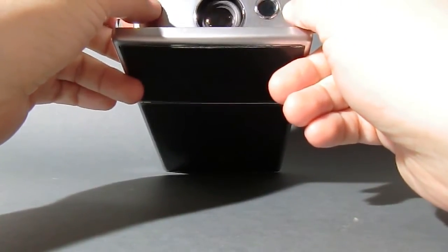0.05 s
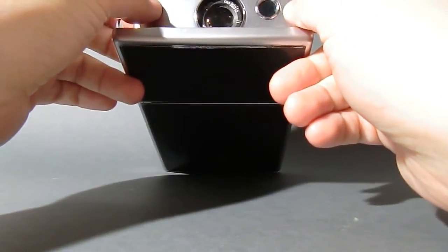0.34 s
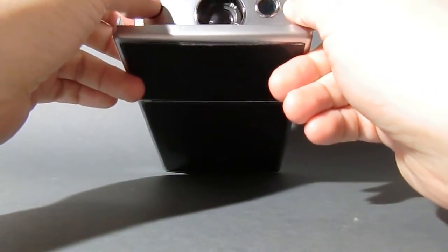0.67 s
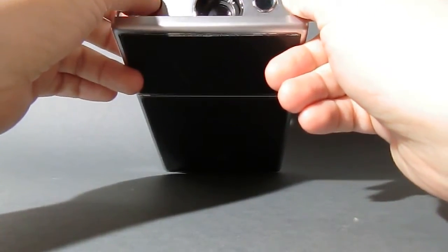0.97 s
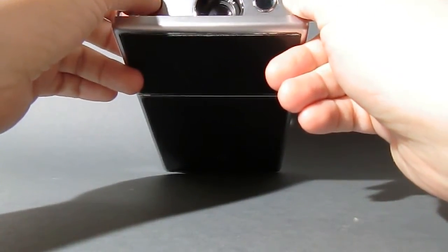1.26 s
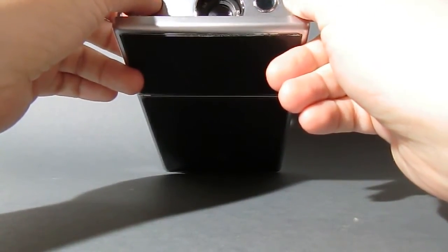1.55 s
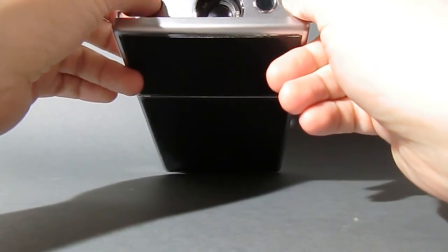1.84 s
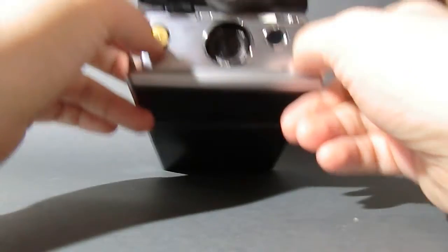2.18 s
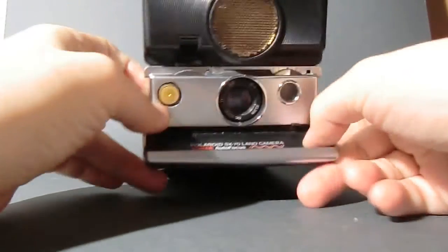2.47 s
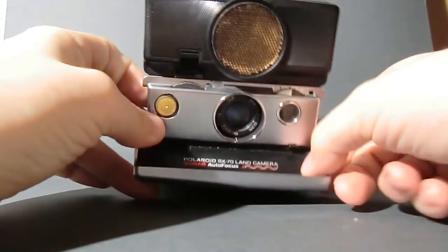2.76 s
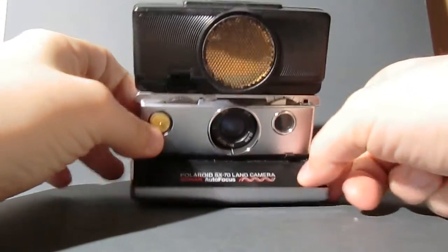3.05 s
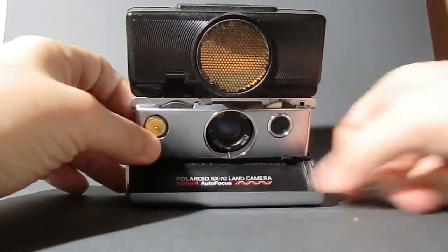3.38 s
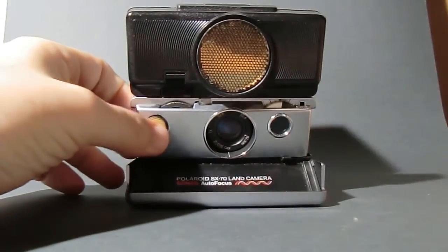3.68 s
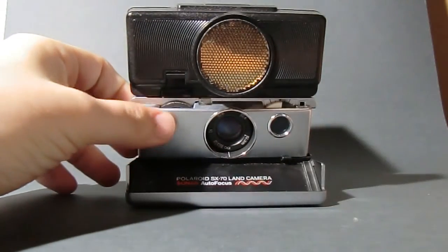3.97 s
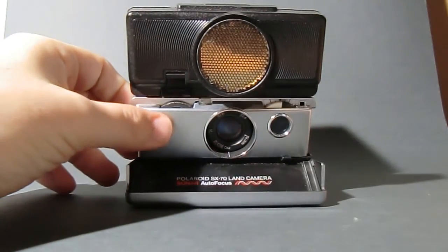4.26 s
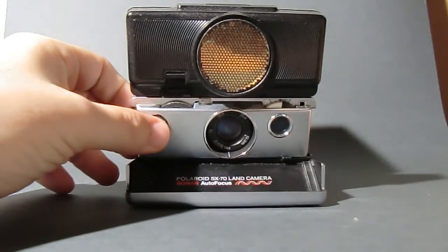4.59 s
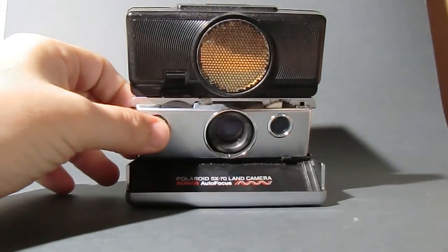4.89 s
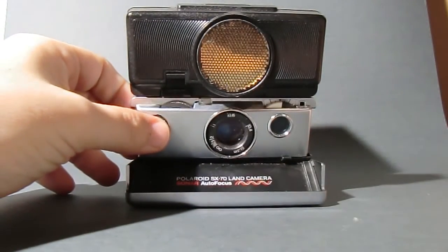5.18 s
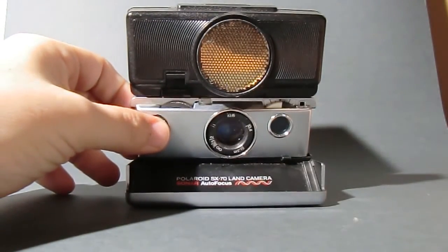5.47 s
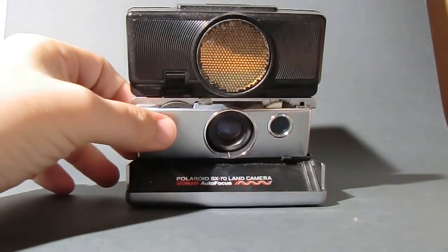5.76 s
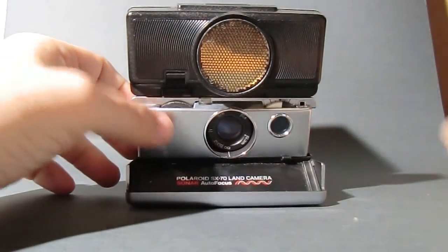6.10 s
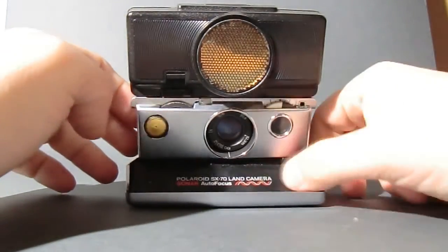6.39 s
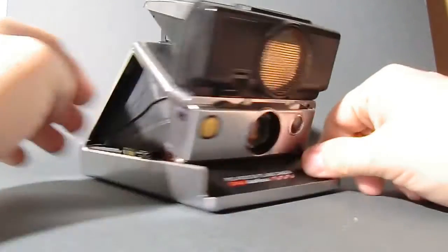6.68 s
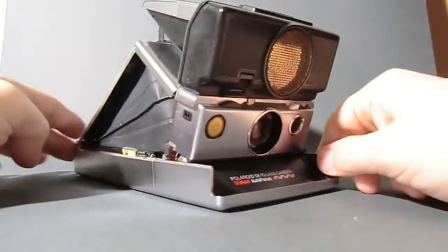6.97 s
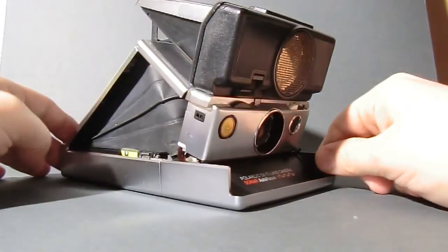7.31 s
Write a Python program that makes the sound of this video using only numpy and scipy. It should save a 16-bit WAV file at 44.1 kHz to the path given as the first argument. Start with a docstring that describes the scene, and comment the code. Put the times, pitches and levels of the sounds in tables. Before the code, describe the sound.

A folding instant camera is handled on a table, close to the microphone, in a small room with a short echo and a low rumble. Its lens motor runs right at the start and again at 0.6 seconds: a clack, gears rattling and whining up to speed, then a hard snap. Two very brief runs with snaps follow at 1.4 and 1.9 seconds. A tiny spring tick trails some of the snaps. Around 2.3 seconds the camera unfolds with a faint, thin metal scrape. Soft hand rubs and light table knocks continue, with a brisker rub near 3.7 seconds. At 4.8 seconds comes the loudest motor run, a bright, buzzing whir that snaps to a stop at 5.1, as the room rumble sinks. Another run swells from 5.6 and snaps at 5.9. Quiet rubs and a couple of soft knocks follow until about 7.3 seconds.

```python
"""On a table in a small room, close to the microphone, someone handles a folding instant camera.
Its lens motor runs six times: a clack, gears rattling and whining up to speed, then a hard snap
against the stop, often followed by a spring's tick. After the fourth run, hands unfold the camera
with a thin metal scrape, rub its shell and knock it softly on the table. The walls give a short
echo, and a low room rumble lies under it all."""
import sys
import numpy as np
from scipy import signal
from scipy.fft import rfft, irfft, next_fast_len
from scipy.io import wavfile

SR = 44100
rng = np.random.default_rng(int(sys.argv[2]) if len(sys.argv) > 2 else 0)


def file_out(sig):
    """Save sig as 16-bit WAV at sys.argv[1]."""
    # one column per channel
    cols = np.atleast_2d(sig).T
    # limit, then scale
    lim = np.clip(cols, -1, 1)
    pcm = np.round(lim * 32767).astype(np.int16)
    wavfile.write(sys.argv[1], SR, pcm)


N = 323694
T = np.arange(N) / SR

# The tone of the room's rumble and hiss. Each row: pitch in Hz, level in dB.
NOISE_COLOUR = [(15, -43), (25, 0), (120, -0.5), (153, -4), (249, -1.5), (363, -4.5), (439, -2.5),
                (591, -10.5), (695, -7.5), (1400, -12), (2050, -13.5), (2350, -15.5), (5880, -21),
                (7920, -23), (16000, -21.5)]
# How loud that noise is over time. Each row: time in seconds, level in dB.
NOISE_LEVELS = [(0, -51), (1.9, -51.5), (2.3, -47.5), (4.0, -47.5), (4.75, -49), (5.25, -57), (6.2, -56.5),
                (6.85, -51.5), (7.34, -50.5)]
# Faint hums. Each row: pitch in Hz, width in Hz, level in dB compared with the noise.
HUMS = [(120.6, 2.4, -17.5), (584.4, 8.2, -19), (1002, 4.7, -19.5), (2090, 8, -25), (3040, 8, -32),
        (7860, 194, -20)]

# Motor runs. Each row: start, stop and spin-up time in seconds, rattle level in dB, swell in dB,
# tilt in dB per octave (more is brighter), base levels of the whine's odd and even harmonics in dB,
# buzz pitch in Hz, buzz level in dB.
MOTOR_RUNS = [(-.012, .152, 0.053, -27, 18, -0.3, -34, -32, 3570, -33),
              (.602, 0.784, .056, -22, 20.5, 0.2, -45, -28, 1600, -29.5),
              (1.371, 1.433, .054, -26.5, 9.5, -.5, -44, -38, 1680, -31.5),
              (1.924, 1.998, .054, -24.5, 11.5, -0.7, -42, -36.5, 2400, -30.5),
              (4.812, 5.082, .052, -20.5, 8, -0.25, -26.5, -34, 3330, -23.5),
              (5.624, 5.914, 0.044, -24, 22, 0.4, -44.5, -31, 3340, -33.5)]
# The notes the camera's shell rings at. Each row: pitch in Hz, width in Hz, gain in dB.
SHELL_NOTES = [(858, 130, 5), (1192, 140, 3), (1350, 120, 5), (1528, 110, 1.5), (1690, 26, -5),
               (2355, 280, -3), (2520, 130, -4.5), (3168, 90, 4), (3550, 110, -0.5), (4880, 290, -9)]
# The rattle's tone with the body folded, and open. Each row: pitch in Hz, level in dB.
RATTLE_FOLDED = [(80, -45), (200, -12.5), (400, -15), (600, -13), (850, -9.5), (1200, -10), (1650, -3.5),
                 (2300, -1.5), (3200, -5), (4100, -9), (5600, -6.5), (7000, -24), (9500, -18.5),
                 (11600, -13.5), (13500, -25), (16000, -28)]
RATTLE_OPEN = [(80, -39), (200, -18.5), (400, -11.5), (600, -13.5), (850, -12.5), (1200, -6), (1650, -6),
               (2300, -3), (3200, -2.5), (4100, -7.5), (5300, -6), (7500, -16), (11500, -15.5),
               (13500, -20.5), (16000, -29)]
# Resonances that lift the whine, folded and open. Each row: pitch in Hz, lift in dB.
LIFTS_FOLDED = [(1680, 16), (2200, 5), (3700, 10)]
LIFTS_OPEN = [(2030, 8.5), (3300, 10), (4540, 8.7)]

# Five kinds of hit. Each row: start in seconds, length in seconds, level in dB, tilt in dB per octave.
CLACKS = [(.001, 0.007, -29, 2), (.605, 0.0052, -30, -1.5), (1.373, 0.0049, -30.5, -2.7),
          (1.9245, .0068, -33.5, -3), (4.8145, 0.0064, -20, 1.8), (5.6255, 0.0066, -31.5, 0.5)]  # the gears take up their slack
SNAPS = [(.153, 0.0036, -14.5, -.8), (.764, 0.003, -15.5, 1), (1.4195, 0.0033, -17.5, 0.5),
         (1.9748, 0.0076, -18, -1.2), (5.0835, 0.0049, -18, 1.2), (5.8965, 0.007, -17, 0.4)]  # the drive hits its far and near stop in turn
TICKS = [(.241, 0.0029, -30, 0.5), (1.3485, 0.0024, -38, 2.5), (1.493, 0.0054, -28.5, -2),
         (4.8055, .0022, -24.5, -1.5), (5.1735, 0.0024, -34.5, 4.5), (6.316, 0.0038, -40, -1.5)]  # latch and spring
JOLTS = [(.776, 0.023, -34, 0), (1.933, .0032, -32.5, 5), (1.985, 0.0052, -32, 5),
         (4.831, 0.0031, -29.5, 2), (4.9655, .0016, -22, -1), (5.922, 0.0035, -26.5, 0)]  # the gears jump a tooth or bounce off the stop
KNOCKS = [(2.481, 0.0046, -47, 2), (2.571, 0.012, -50, -2), (2.597, 0.0072, -50.5, -5),
          (3.207, 0.0082, -52, -2), (3.472, .01, -48, 5.5), (6.471, 0.005, -48, 2),
          (7.017, 0.0023, -53.5, -5.5)]  # shell and table bump softly
# Borders of the pitch bands in Hz, then the tone of each hard hit as one level in dB per band.
HIT_EDGES = [680, 1100, 1900, 2800, 4200, 7500, 14500]
CLACK_COLOUR = [-1.5, 0.5, -10, -3.5, -9.5, -17.5]
STOP_COLOURS = [
    [-10.5, -1, -1, 0, -2.5, -1.5],
    [-21, -1.6, -17, 0, -5.5, -9.5],
]  # far stop, then near stop
TICK_COLOUR = [-18.5, -19.5, -14.5, -14.5, -9, -3]
JOLT_COLOUR = [-18, -4.5, -2, -2.5, -13, -14.5]
# The same for the knocks: borders in Hz, then one level in dB per band.
KNOCK_EDGES = [60, 250, 700, 1800, 5000, 15000]
KNOCK_COLOUR = [-16, 2.5, 4.5, 1, 1]
# Short rings of spring or shell. Each row: start in seconds, pitch in Hz, level in dB.
PINGS = [(0.24, 9400, -39), (1.493, 9800, -41), (2.482, 1700, -46), (3.209, 990, -42), (3.472, 1390, -38),
         (5.174, 9400, -48)]

# Hand strokes. Each row: peak time, rise and fall in seconds, level in dB, tilt in dB per octave.
RUBS = [(2.309, .11, 0.15, -49, 0.2), (2.52, .048, 0.18, -53, 3.2), (2.61, .043, 0.093, -48, -3.5),
        (2.76, 0.064, 0.068, -57.5, 3.5), (3.08, 0.23, 0.18, -57.5, 3.5), (3.42, 0.097, 0.084, -49.5, 4),
        (3.661, .012, 0.036, -38, 2), (3.73, 0.022, 0.035, -44.5, 2), (6.172, 0.045, .008, -57, 4),
        (6.365, .04, .084, -58, 5.5), (6.6, 0.06, 0.11, -53.5, 0.7), (6.755, 0.084, 0.047, -52, 3.5),
        (6.945, 0.11, 0.12, -59, 5), (7.21, .07, 0.082, -58, 1.5)]
# Their tone: band borders in Hz, then one level in dB per band.
RUB_EDGES = [250, 1000, 2500, 6000, 13000]
RUB_COLOUR = [-4.5, -0.5, -1, -0.5]
# The ring of the sliding strut: pitch in Hz, width in Hz, level in dB.
STRUT_RING = (3700, 1700, -47)

# The echo's band borders in Hz, then its bands. Each row: seconds to fade by 60 dB, level in dB.
ECHO_EDGES = [200, 1000, 2900, 3900, 7000, 16000]
ECHO_BANDS = [(0.27, -11.5), (0.31, -12.5), (0.23, -33), (0.33, -13), (0.23, -13)]
# The microphone's tone. Each row: pitch in Hz, gain in dB.
MICROPHONE = [(100, 1), (11500, 0), (13500, -3.5), (15500, -3)]

TOOTH_HZ = 1159  # gear teeth meeting per second at full speed
PIVOT_HZ = 2500  # a tilt leaves this pitch unchanged
UNFOLD_S = 2.25  # the middle of the unfolding


def undb(db):
    """Turn decibels into a gain to multiply by."""
    return 10 ** (np.asarray(db) / 20)


def unit(x):
    """Scale a sound to an average (rms) level of 1."""
    return x / np.sqrt(np.mean(x ** 2) + 1e-20)


def add(out, s, x):
    """Mix x into out, starting at s seconds."""
    i = int(s * SR)
    x, i = x[max(-i, 0):], max(i, 0)
    out[i:i + len(x)] += x[:N - i]


def band(x, lo, hi, order=3):
    """Keep the pitches between lo and hi Hz."""
    return signal.sosfilt(signal.butter(order, [lo, hi], "band", fs=SR, output="sos"), x)


def resonate(x, hz, width):
    """Let a sound ring around one pitch."""
    return signal.lfilter(*signal.iirpeak(hz, hz / width, fs=SR), x)


def narrow(x, hz, width):
    """Ring twice for a clearer pitch, scaled to level 1."""
    return unit(resonate(resonate(x, hz, width), hz, width))


def colour(x, points):
    """Shape the tone along a curve of (Hz, dB) points."""
    hz, db = np.transpose(points)
    size = next_fast_len(len(x))
    freqs = np.maximum(np.arange(size // 2 + 1) * SR / size, 1)
    gain = undb(np.interp(np.log(freqs), np.log(hz), db))
    return irfft(rfft(x, size) * gain, size)[:len(x)]


def tilted(levels_db, edges, tilt_db):
    """Lean band levels by tilt_db per octave: harder contact is brighter."""
    centres = np.sqrt(np.multiply(edges[:-1], edges[1:]))
    return np.add(levels_db, tilt_db * np.log2(centres / PIVOT_HZ))


def walk(n, rate):
    """A random wander of size about 1 that turns rate times a second."""
    knots = rng.standard_normal(int(n / SR * rate) + 2)
    return unit(np.interp(np.arange(n) / SR * rate, np.arange(len(knots)), knots))


def contacts(n, spread_db):
    """A dense stream of tiny impacts of uneven size."""
    return unit(rng.standard_normal(n) * undb(spread_db * rng.standard_normal(n)))


def shell(x):
    """Every impact also makes the hollow shell ring."""
    return x + sum(undb(db) * resonate(x, hz, width) for hz, width, db in SHELL_NOTES)


def room_noise():
    """Rumble, hiss and faint hum; the level sinks at about five seconds and creeps back."""
    noise = unit(colour(rng.standard_normal(N), NOISE_COLOUR))
    hum = sum(undb(db) * narrow(rng.standard_normal(N), hz, width) for hz, width, db in HUMS)
    return (noise + hum) * undb(np.interp(T, *np.transpose(NOISE_LEVELS)))


def gear_rattle(turn, spectrum, rattle_db, buzz_hz, buzz_db, flutter_db=1.57, buzz_q=9):
    """Loose gears collide in uneven flurries, bunched at each tooth, and set one part buzzing."""
    n = len(turn)
    drive = (1 + 0.29 * np.cos(TOOTH_HZ * turn)) * undb(flutter_db * walk(n, 333.8))
    rattle = unit(colour(shell(drive * contacts(n, spread_db=1.5)), spectrum))
    buzz = narrow(drive * contacts(n, spread_db=3.0), buzz_hz, buzz_hz / buzz_q)
    return undb(rattle_db) * rattle + undb(buzz_db) * buzz


def gear_whine(speed, turn, lifts, odd_db, even_db, octave_fall_db=4, waver_db=2.5, width_hz=115):
    """Meeting teeth make four rising harmonics; each sings out as it passes a resonance."""
    whine = 0
    for k, db in enumerate([odd_db, even_db] * 2, 1):
        pitch = k * TOOTH_HZ * speed
        lift = sum(lift_db / (1 + ((pitch - hz) / width_hz) ** 2) for hz, lift_db in lifts)
        radiated = 1 - 1 / (1 + (pitch / 1020) ** 10)  # the small body gives off little below 1020 Hz
        gain = undb(db - octave_fall_db * np.log2(k) + lift + waver_db * walk(len(turn), 45.6))
        whine = whine + radiated * gain * np.sqrt(2) * np.sin(k * TOOTH_HZ * turn)
    return whine


def motor(run, wobble=0.0088, shaft_hz=94, ease_s=0.01):
    """The motor spins up, and its gears grow louder with speed until the stop."""
    start, stop, spin_up_s, rattle_db, swell_db, tilt_db, odd_db, even_db, buzz_hz, buzz_db = run
    tone, lifts = (RATTLE_FOLDED, LIFTS_FOLDED) if start < UNFOLD_S else (RATTLE_OPEN, LIFTS_OPEN)
    spectrum = [(hz, db + tilt_db * np.log2(hz / PIVOT_HZ)) for hz, db in tone]
    length = stop - start
    t = np.arange(int((length + 0.011) * SR)) / SR
    speed = 1 - np.exp(-t / spin_up_s)
    # multiply turn by a full-speed pitch in Hz to get that tone's phase
    turn = 2 * np.pi * np.cumsum(speed * (1 + wobble * walk(len(t), 250))) / SR
    rattle = gear_rattle(turn, spectrum, rattle_db, buzz_hz, buzz_db)
    whine = gear_whine(speed, turn, lifts, odd_db, even_db)
    easing = 1 - np.exp(-np.maximum(length - t, 0) / ease_s)  # the whine fades just before the stop
    # the unbalanced shaft only shakes the body near full speed
    shake = undb(rattle_db - 25.5 + 2 * walk(len(t), 30)) * speed ** 10
    shaft = shake * np.sqrt(2) * np.sin(shaft_hz * turn)
    on_off = np.clip(t / .002, 0, 1) * np.exp(-np.maximum(t - length, 0) / 0.0014)
    swell = undb(-swell_db * (1 - speed) ** 1.44)
    return (rattle + whine * speed ** 2 * easing + shaft) * on_off * swell


def hit(length, levels_db, edges, ring_share, ring_s, rise_share=0.14):
    """Parts chatter briefly, then the shell rings out; longer hits start more softly."""
    t = T[:SR // 16]
    rise = 1 - np.exp(-t / (rise_share * length))
    fade = np.exp(-(t / length) ** 2) + ring_share * np.exp(-t / ring_s)
    out = 0
    for lo, hi, db in zip(edges, edges[1:], levels_db):
        chatter = band(shell(rise * fade * contacts(len(t), spread_db=2.0)), lo, hi)
        level = np.sqrt(np.sum(chatter ** 2) / (length * SR))
        out = out + undb(db) * chatter / level
    return out


def ping(hz, fade_s=0.018, q=12):
    """A spring rings on after a tick, or the shell after a knock."""
    t = T[:SR // 5]
    return np.exp(-t / fade_s) * narrow(rng.standard_normal(len(t)), hz, hz / q)


def mechanism():
    """The camera's own sounds: motor runs, hard little hits and pings."""
    out = np.zeros(N)
    for run in MOTOR_RUNS:
        add(out, run[0], motor(run))
    kinds = [(CLACKS, CLACK_COLOUR), (SNAPS[0::2], STOP_COLOURS[0]), (SNAPS[1::2], STOP_COLOURS[1]),
             (JOLTS, JOLT_COLOUR), (TICKS, TICK_COLOUR)]
    for events, tone in kinds:
        for start, length, db, tilt_db in events:
            levels_db = tilted(tone, HIT_EDGES, tilt_db)
            add(out, start, undb(db) * hit(length, levels_db, HIT_EDGES, ring_share=0.21, ring_s=0.0099))
    for start, hz, db in PINGS:
        add(out, start, undb(db) * ping(hz))
    return out


def strut_scrape(half_length_s=0.09):
    """A thin metal strut rings as it slides while the body unfolds."""
    hz, width, db = STRUT_RING
    swell = np.exp(-((T - UNFOLD_S) / half_length_s) ** 2)
    return undb(db) * swell * narrow(contacts(N, spread_db=1), hz, width)


def hand_rubs(grain_db=0.73):
    """Skin slides over shell and table top in grainy swells."""
    out = np.zeros(N)
    for peak, rise, fall, rub_db, tilt_db in RUBS:
        t = np.arange(-2 * rise, 2 * fall, 1 / SR)
        swell = np.exp(-(t / np.where(t < 0, rise, fall)) ** 2)
        flicker = undb(grain_db * walk(len(t), 159))
        grains = 0
        for lo, hi, db in zip(RUB_EDGES, RUB_EDGES[1:], tilted(RUB_COLOUR, RUB_EDGES, tilt_db)):
            grains = grains + undb(db) * unit(band(contacts(len(t), spread_db=6), lo, hi, order=2))
        add(out, peak - 2 * rise, undb(rub_db) * swell * flicker * grains)
    return out


def table_knocks():
    """The camera bumps softly on the table."""
    out = np.zeros(N)
    for start, length, db, tilt_db in KNOCKS:
        levels_db = tilted(KNOCK_COLOUR, KNOCK_EDGES, tilt_db)
        add(out, start, undb(db) * hit(length, levels_db, KNOCK_EDGES, ring_share=0.15, ring_s=0.01))
    return out


def wall_echo(x, late_db=-19, late_fade_s=0.49, build_s=0.005):
    """Near walls give a quick, dense echo and a fainter, longer tail."""
    t = T[:int(SR * .7)]
    build_up = 1 - np.exp(-(t / build_s) ** 2)
    response = 0
    for lo, hi, (fade_s, db) in zip(ECHO_EDGES, ECHO_EDGES[1:], ECHO_BANDS):
        decay = undb(-60 * t / fade_s) + undb(late_db - 60 * t / late_fade_s)
        tail = rng.standard_normal(len(t)) * decay * build_up
        response = response + undb(db) * band(tail / np.sqrt(np.sum(tail ** 2)), lo, hi, order=2)
    return signal.fftconvolve(x, response)[:N]


def scene(count=2):
    """The camera chatters differently in each direction: one reaches the microphone, all the walls."""
    handling = strut_scrape() + hand_rubs() + table_knocks()
    directions = [mechanism() for _ in range(count)]
    echo = sum(wall_echo(x + handling) for x in directions) / np.sqrt(count)
    return (directions[0] + handling + echo + room_noise())[None]


def record(dry, top_hz=15900):
    """The microphone rounds off the hardest snaps, then dulls and cuts the highest treble."""
    rounded = .85 * np.tanh(dry[0] / .85)
    treble_cut = signal.ellip(10, .2, 70, top_hz, fs=SR, output="sos")
    return signal.sosfilt(treble_cut, colour(rounded, MICROPHONE))[None]


dry = scene()
out = record(dry)
file_out(out)
```